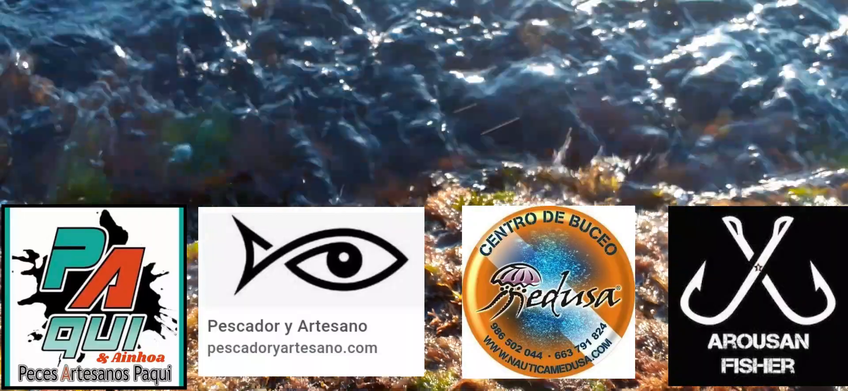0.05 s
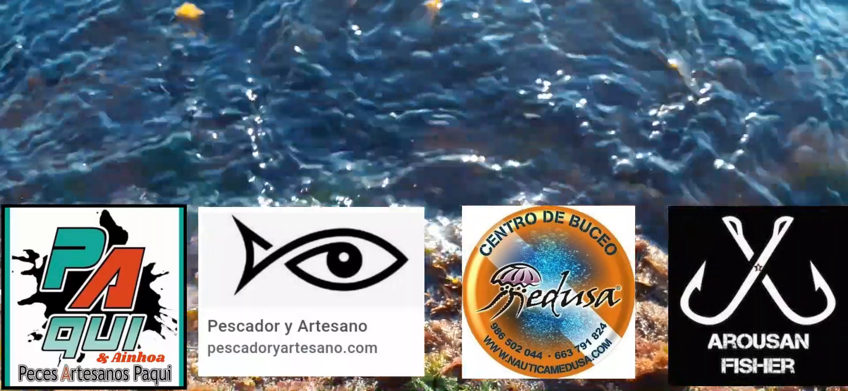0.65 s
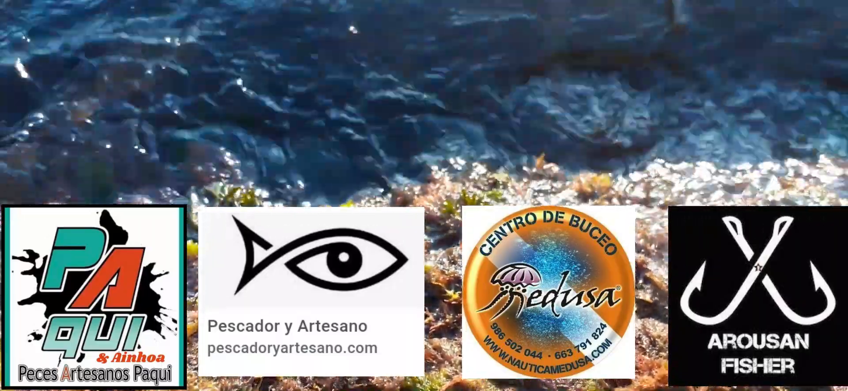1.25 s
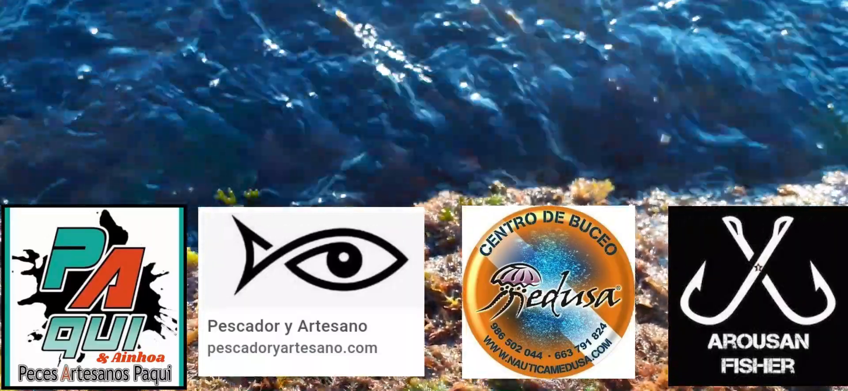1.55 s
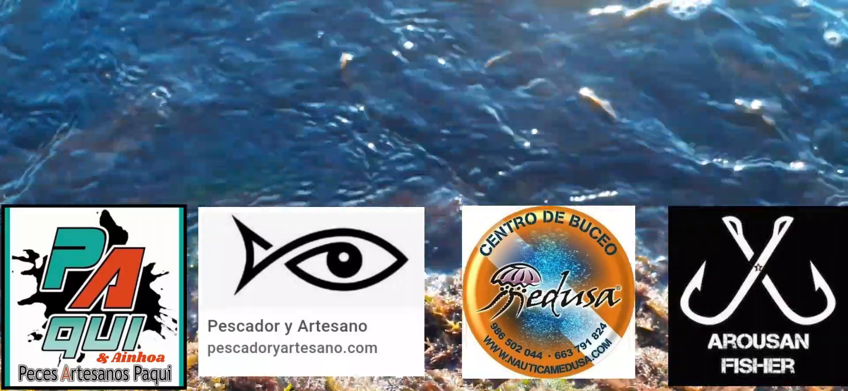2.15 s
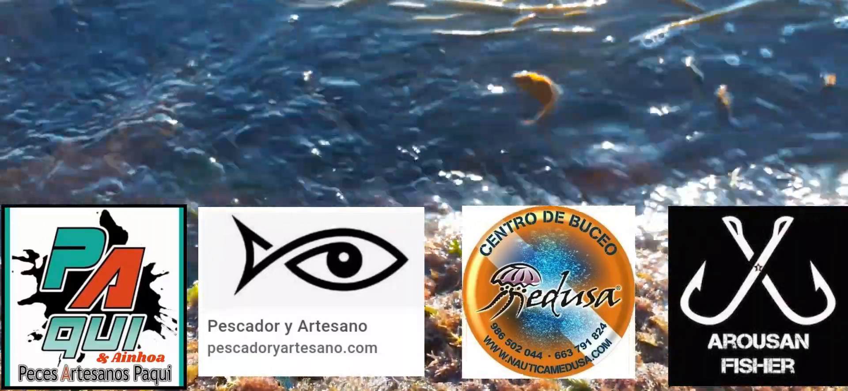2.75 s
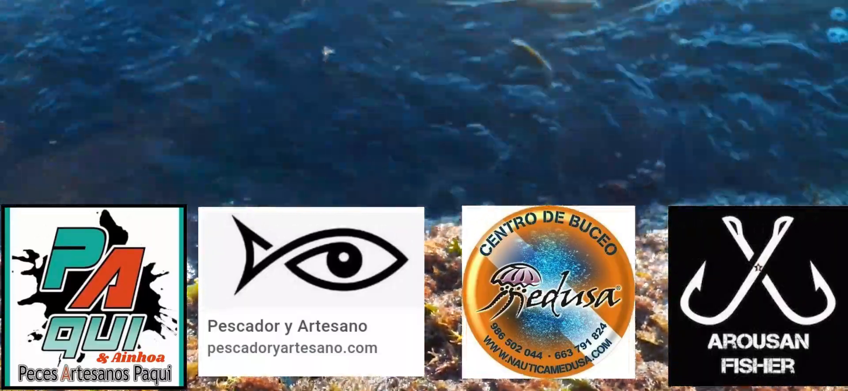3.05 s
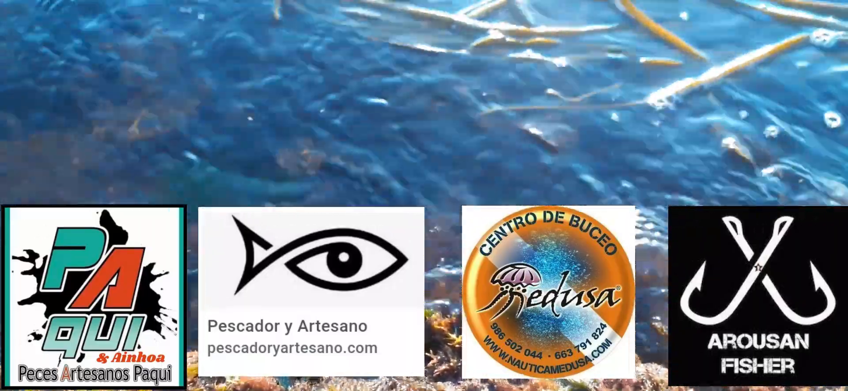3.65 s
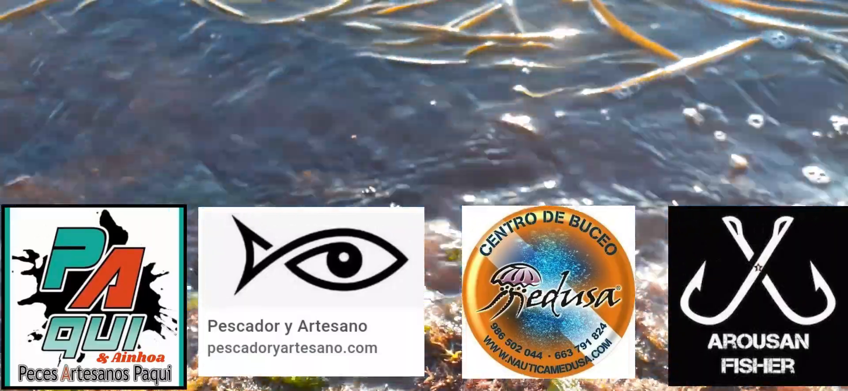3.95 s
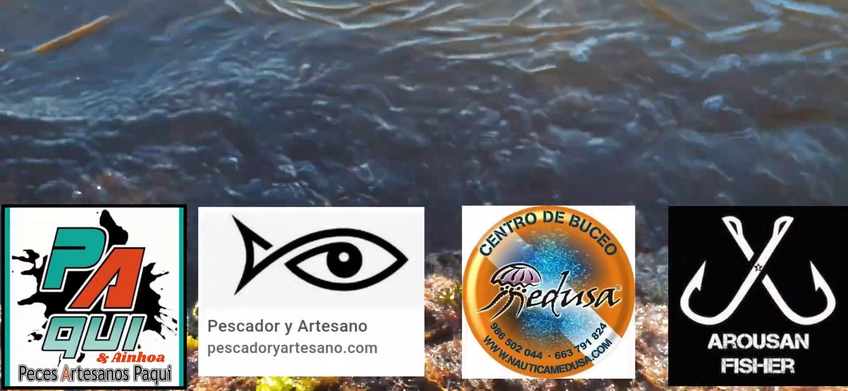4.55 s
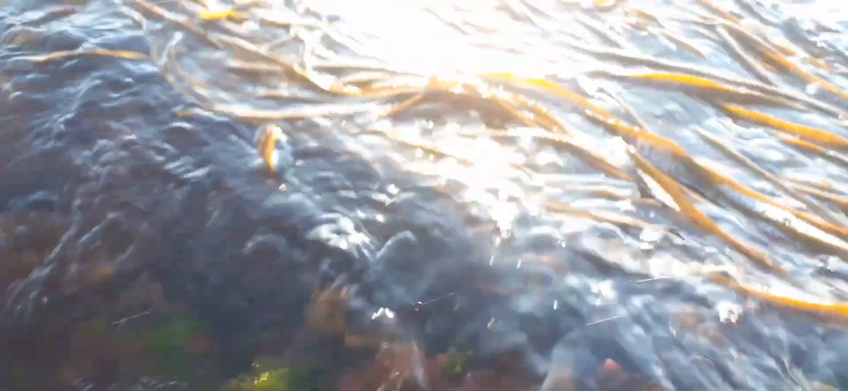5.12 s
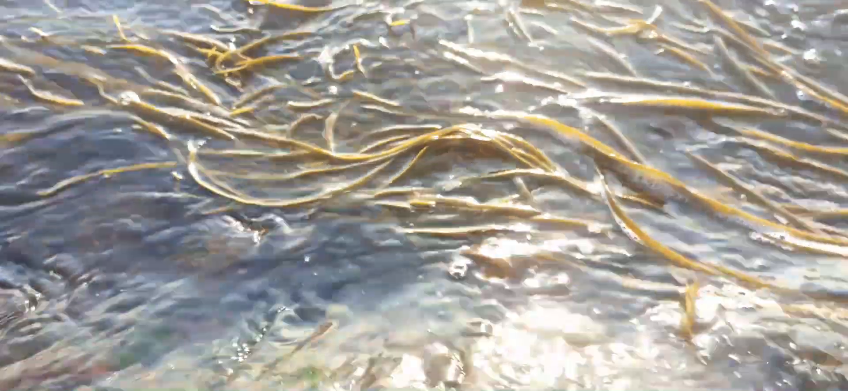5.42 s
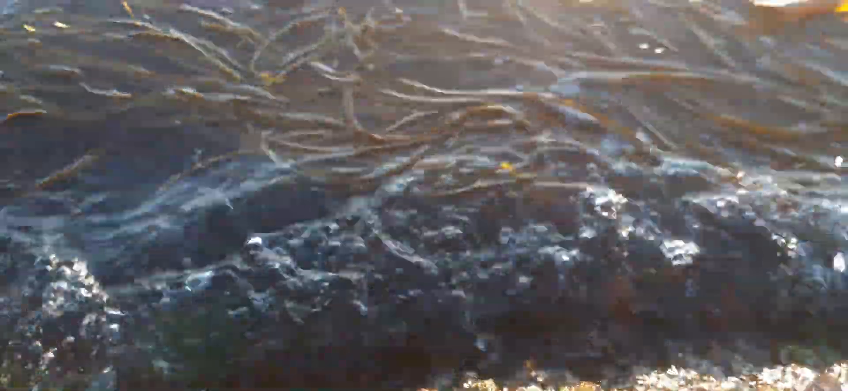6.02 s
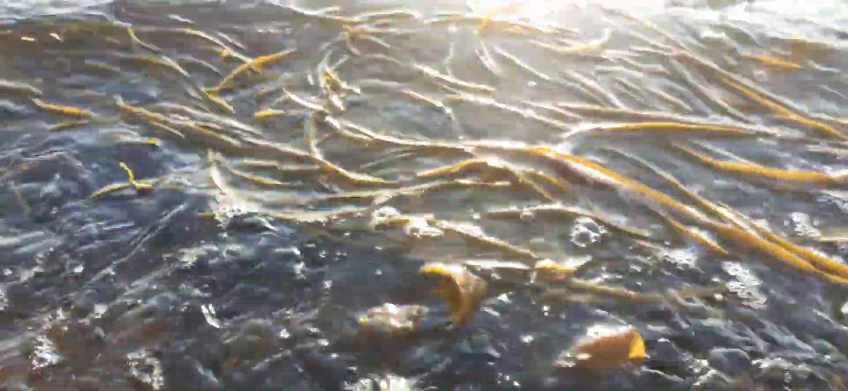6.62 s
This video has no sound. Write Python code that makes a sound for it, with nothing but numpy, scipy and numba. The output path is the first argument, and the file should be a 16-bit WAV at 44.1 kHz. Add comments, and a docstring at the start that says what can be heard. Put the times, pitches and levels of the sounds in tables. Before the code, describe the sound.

Shallow seawater laps and gurgles over shore rocks, building to louder splashes while a breeze buffets the microphone.

```python
"""Shallow sea laps over weedy shore rocks, close below a small stereo microphone; open sea hisses faintly.
From the start swarms of ringing bubbles gurgle, slosh, splash and fizz, with single drops, plops and
slaps standing out. A breeze buffets the two ports, mostly in the first 4 s. The lapping slowly builds.
From 3.7 s air pockets glug in rock hollows; from about 4.8 s the three biggest wavelets break."""
import sys
import numpy as np
from scipy import signal
from scipy.fft import rfft, irfft, next_fast_len
from scipy.io import wavfile
from scipy.ndimage import uniform_filter1d
from numba import njit

SR = 44100
rng = np.random.default_rng(int(sys.argv[2]) if len(sys.argv) > 2 else 0)


def bounce(signal):
    """Save signal as a 16-bit WAV file at the path given by the first command-line argument."""
    frames = np.transpose(np.atleast_2d(signal))
    limited = np.clip(frames, -1, 1)
    pcm = np.round(limited * 32767).astype(np.int16)
    wavfile.write(sys.argv[1], SR, pcm)


N = 303431
TIME_S = np.arange(N) / SR
FFT_SIZE = next_fast_len(N + 8192)
FREQS_HZ = np.maximum(np.fft.rfftfreq(FFT_SIZE, 1 / SR), 1)

# Table levels are relative; each source adds its own gain.
# layer spectra: freq_hz, gain_db
FAR_SEA_SPECTRUM = [(100, -58), (300, 8.5), (600, 8.5), (1000, -15), (1400, -21), (2200, -5), (4500, -5),
                    (7900, -5), (9500, -13.5), (12000, -5), (16000, -11)]
GURGLE_SPECTRUM = [(120, -26.5), (250, -6), (400, -2.5), (520, 0.5), (660, 2.5), (790, -4), (900, -9),
                   (1100, -5), (1500, -41.5)]
SLOSH_SPECTRUM = [(600, -26.5), (850, -7), (1000, -1), (1150, 0), (1350, 1), (1580, 1), (1760, -5.5),
                  (2300, -39)]
SPLASH_SPECTRUM = [(1200, -10), (1700, -3.5), (1950, -0.5), (2300, -1), (2700, -6.5), (3100, -9.5),
                   (4000, -22)]
SPRAY_SPECTRUM = [(2000, -28.5), (3200, -1.5), (4000, 1), (4700, -0.5), (5700, -0.5), (6600, 0), (7900, 0),
                  (8500, -7.5), (9200, -14.5), (10300, -8.5), (12000, -8), (13500, -6), (16000, -16)]
WIND_SPECTRUM = [(15, -31), (30, -9.5), (50, -3.5), (75, 1), (120, 0.5), (200, -5), (320, -11.5),
                 (500, -21), (1000, -52)]
# left-port delay round the microphone body at bearing 1: freq_hz, lag_ms
PORT_LAG = [(300, 0.43), (700, 0.29), (1000, 0.22), (1400, 0.36), (1750, 0.34), (2000, 0.844), (2600, 0.41),
            (4000, 0.29), (7000, 0.338)]
# stretches of shore (0 ahead, 1 far right): bearing
SHORE_BEARINGS = [1.034, 1.245, 0.777, 0.643, 0.363, -1.2]
# where the water is busiest: time_s, bearing
BUSIEST_BEARING = [(0, 0.76), (4.6, 0.98), (5.1, 0.74), (5.5, 1), (5.9, 0.64), (6.3, 0.82), (6.88, 0.98)]
# lapping between the rocks: time_s, level_db
LAPPING_FLOW = [(0.45, -57), (0.87, -57.5), (1.14, -53.5), (1.41, -55.5), (2.15, -46), (2.51, -47),
                (2.92, -48.5), (3.76, -44), (3.98, -42), (4.05, -48.5), (4.134, -43.5), (4.666, -43),
                (4.7, -48), (6.47, -40), (6.552, -47.5), (6.8, -42.5)]
# response of gurgle, slosh, splash, spray to the lapping: usual_level_db, db_per_flow_db
FLOW_RESPONSE = [(-42.5, 1.0), (-48.5, 1.01), (-49.5, 1.0), (-50, 1.4)]
# wavelets on the rocks: crest_s, rise_s, decay_s, gurgle_db, slosh_db, splash_db, spray_db
WAVELETS = [(0.053, .012, 0.018, -36, -49, -54, -50.5), (0.124, 0.0065, 0.046, -45, -48, -43.5, -48),
            (0.235, 0.013, 0.084, -41, -55, -51.5, -57), (0.38, 0.018, 0.0078, -54, -58, -49, -45),
            (2.66, 0.013, 0.11, -45, -53, -54, -64), (3.069, 0.078, 0.097, -47.5, -49.5, -52.5, -73),
            (3.305, 0.022, 0.048, -45, -44, -47, -44.5), (3.529, 0.069, 0.092, -37, -48, -47, -49.5),
            (3.914, 0.0072, 0.02, -29.5, -44, -43.5, -53), (4.754, 0.015, 0.22, -37, -37.5, -39.5, -41.5),
            (4.855, 0.015, 0.06, -21.5, -27.5, -28.5, -35), (4.971, 0.13, 0.25, -29, -35, -34.5, -38),
            (5.35, 0.057, 0.055, -38, -37, -46, -45.5), (5.839, 0.014, 0.22, -39.5, -31, -45, -42),
            (5.895, 0.11, .12, -41.5, -36.5, -37, -37), (6.195, 0.026, 0.015, -40, -49, -42, -40),
            (6.293, 0.0098, 0.039, -27.5, -29.5, -32.5, -49)]
# puffs of breeze: middle_s, half_length_s, level_db, left_minus_right_db
PUFFS = [(0.092, 0.017, -30, -3), (0.303, .13, -37, -7.5), (0.616, 0.058, -46.5, -12),
         (0.96, 0.022, -38.5, -10), (1.137, 0.064, -44, -18), (1.936, 0.089, -42.5, -1.5),
         (2.424, 0.038, -35.5, -8), (2.57, .11, -38, -5.5), (3.251, 0.052, -38.5, -5),
         (3.588, 0.036, -35.5, -5.5), (3.798, 0.084, -36.5, -23), (3.966, .04, -43, -13),
         (4.383, 0.058, -43.5, -11), (4.606, 0.069, -38.5, -4), (4.823, 0.064, -40, -5.5),
         (5.043, 0.046, -37, -1), (5.46, .12, -46, -10), (5.924, .22, -44.5, -7.5),
         (6.254, 0.038, -33.5, -9), (6.363, 0.025, -37.5, 2), (6.8, 0.025, -51, -21)]
# eddies hitting the ports: start_s, level_db, centre_hz, left_minus_right_db
EDDIES = [(0.032, -11, 101, 6), (0.043, -11, 151, 4), (0.054, -17.5, 480, 8), (0.077, -19, 400, -18),
          (0.1, -17.5, 93.5, -3), (0.148, -17, 201, -3.5), (0.214, -20.5, 109, -1), (0.231, -20, 225, 6.5),
          (0.281, -19.5, 92, 6), (0.569, -29.5, 287, -6), (0.599, -34.5, 203, 2), (0.628, -30, 160, 9),
          (0.959, -31.5, 300, -1.5), (1.199, -43, 200, -9), (1.941, -23.5, 266, 4), (2.344, -29, 118, -11),
          (2.393, -26, 89, -1), (2.526, -19, 90, -5), (2.647, -20.5, 225, -8), (2.756, -30, 130, -6),
          (3.382, -27.5, 207, 6), (3.554, -24.5, 286, 2.5), (3.584, -22, 165, -6), (3.808, -21.5, 403, 10),
          (3.988, -26, 197, 4), (4.572, -21.5, 151, -2.5)]
# flung drops landing: start_s, ring_db, pitch_hz, impact_db
DROPS = [(0.1208, -32, 7700, -42), (0.127, -22.5, 3540, -59), (0.135, -27, 3040, -61),
         (0.2184, -26, 4030, -43), (0.249, -32, 4700, -42), (0.363, -26, 4600, -44.5),
         (0.3765, -36, 3060, -47), (0.394, -30, 8000, -45), (0.4524, -32, 3290, -48.5),
         (0.5067, -21.5, 7160, -55), (1.6356, -45, 6900, -49), (1.94, -30.5, 3210, -61),
         (2.3281, -32.5, 3950, -66), (2.524, -25.5, 5280, -64), (3.3078, -18, 7540, -42),
         (3.4052, -31, 7960, -45.5), (3.5525, -14, 7080, -37), (3.6303, -17.5, 7130, -40),
         (4.7575, -37, 3100, -32.5), (4.8775, -14.5, 3770, -46), (5.0028, -18, 7600, -44),
         (5.0922, -15, 7540, -37), (5.1349, -19, 2870, -36), (5.8884, -14, 7600, -39),
         (5.895, -15.5, 4160, -32), (6.201, -13, 4770, -31.5), (6.322, -19.5, 3750, -52),
         (6.338, -20.5, 3980, -56.5), (6.4846, -34, 3280, -43), (6.6294, -22, 4300, -45),
         (6.7078, -40, 5340, -42.5)]
# single large bubbles: start_s, level_db, pitch_hz
PLOPS = [(0.121, -26, 1040), (1.6716, -39.5, 2180), (1.7265, -42, 1410), (3, -38, 1560),
         (3.1103, -33.5, 1360), (3.1802, -37.5, 2090), (3.3513, -37.5, 2030), (3.6758, -29, 1456),
         (4.8509, -17.5, 1940), (4.9253, -18, 2257), (4.98, -21, 1500), (5.3322, -25, 1160),
         (5.387, -21, 1330), (6.2882, -22, 2115), (6.3014, -22, 2120), (6.7583, -32, 1360)]
# sheets of water hitting rock: start_s, level_db, centre_hz, decay_s
SLAPS = [(0.122, -31, 1110, 0.003), (0.214, -22, 925, 0.0036), (0.24, -21, 2460, 0.0041),
         (3.287, -17, 2900, 0.0043), (3.552, -19, 1810, 0.0032), (3.906, -33, 1120, 0.0096),
         (4.194, -24.5, 950, 0.011), (4.653, -25, 2040, 0.0042), (4.719, -21, 2000, 0.018),
         (4.759, -19, 1100, 0.0039), (4.791, -17.5, 1130, 0.011), (4.816, -15, 1980, 0.0074),
         (4.869, -9.5, 1800, 0.046), (4.926, -9.5, 2160, 0.0062), (5.135, -14, 1250, 0.017),
         (5.759, -17.5, 1840, 0.0051), (5.806, -17, 2450, 0.0069), (5.828, -19, 1000, 0.0071),
         (5.843, -19, 1110, 0.019), (5.881, -16, 1300, 0.01), (5.937, -30, 1540, 0.0059),
         (6.179, -24, 1090, 0.0055), (6.63, -26, 2020, 0.012)]
# air pockets in rock hollows: start_s, level_db, pitch_hz, t60_s
GLUGS = [(3.719, -24, 375, 0.026), (4.846, -6.5, 756, 0.057), (4.85, -7.5, 470, 0.023),
         (4.863, -8.5, 717, 0.029), (4.882, -11, 697, 0.048), (5.039, -12, 621, 0.047),
         (5.497, -19.5, 320, 0.048), (5.665, -3.5, 266, 0.012), (5.808, -4, 224, 0.013),
         (5.905, -15.5, 275, 0.04), (6.101, -12.5, 196, 0.018), (6.223, -3.5, 405, 0.012),
         (6.25, -7.5, 192, 0.032), (6.265, -6, 320, 0.024), (6.344, -18.5, 172, 0.039)]


def from_db(db):
    """Decibels to gain."""
    return 10 ** (np.asarray(db) / 20)


def unit_rms(x):
    """Scale to rms 1."""
    return x / np.sqrt(np.mean(x ** 2) + 1e-20)


def curve(points):
    """A (time_s, value) table, per sample."""
    return np.interp(TIME_S, *np.transpose(points))


def drift(corner_hz):
    """Slow random wander, rms 1."""
    hop, settle = 40, 2000
    pole = np.exp(-2 * np.pi * corner_hz * hop / SR)
    noise = rng.standard_normal(N // hop + settle + 2)
    slow = signal.lfilter([1], [1, -2 * pole, pole ** 2], noise)[settle:]
    return np.interp(np.arange(N) / hop, np.arange(len(slow)), unit_rms(slow))


def bandpass(x, low_hz, high_hz):
    """Butterworth band-pass."""
    return signal.sosfilt(signal.butter(2, [low_hz, high_hz], "band", fs=SR, output="sos"), x)


def colour(x, spectrum):
    """Minimum-phase filter with the given spectrum."""
    freq_hz, gain_db = np.transpose(spectrum)
    gain = from_db(np.interp(np.log(FREQS_HZ), np.log(freq_hz), gain_db))
    cepstrum = irfft(np.log(gain), FFT_SIZE)
    cepstrum[1:FFT_SIZE // 2] *= 2
    cepstrum[FFT_SIZE // 2 + 1:] = 0
    return irfft(rfft(x, FFT_SIZE) * np.exp(rfft(cepstrum)), FFT_SIZE)[..., :N]


def levelled(x, span_s):
    """Hold the stereo mid at rms 1 over span_s; faster grain stays."""
    size = int(span_s * SR)
    power = uniform_filter1d(uniform_filter1d(x.mean(0) ** 2, size), size)
    return x / np.sqrt(np.maximum(power, 1e-6 * power.mean()))


def at_ports(streams, echo_t60_s=0.045, echo_db=-7.5):
    """One stream per bearing reaches both ports, direct and scattered by the rocks."""
    spectra = rfft(np.atleast_2d(streams), FFT_SIZE)
    freq_hz, lag_ms = np.transpose(PORT_LAG)
    lag_s = np.interp(np.log(FREQS_HZ), np.log(freq_hz), lag_ms) / 1000
    lag_rad = 2 * np.pi * FREQS_HZ * lag_s
    left = sum(part * np.exp(-1j * lag_rad * bearing) for part, bearing in zip(spectra, SHORE_BEARINGS))
    right = spectra.sum(0)
    t = TIME_S[:8192]
    scatter = rng.standard_normal((2, len(t))) * from_db(-60 * t / echo_t60_s) * (t > 0.001)
    scatter *= from_db(echo_db) / np.sqrt((scatter ** 2).sum(1, keepdims=True))
    return irfft(np.array([left, right]) + right * rfft(scatter, FFT_SIZE), FFT_SIZE)[:, :N]


def far_sea(level_db=-58.5):
    """Open sea: faint, even hiss."""
    return from_db(level_db) * unit_rms(colour(rng.standard_normal((2, N)), FAR_SEA_SPECTRUM))


def water_levels_db(usual_flow_db=-41, uneven_db=2.68, foam_linger=1.61):
    """Level per bubble size: lapping plus wavelets that swell, crest and drain; foam lasts longest."""
    flow_db = curve(LAPPING_FLOW) - usual_flow_db + uneven_db * drift(13)
    power = np.array([from_db(usual_db + slope * flow_db) ** 2 for usual_db, slope in FLOW_RESPONSE])
    for crest_s, rise_s, decay_s, *sizes_db in WAVELETS:
        age_s = TIME_S - crest_s
        body, foam = (np.exp(np.maximum(np.minimum(age_s / rise_s, -age_s / fall_s), -20))
                      for fall_s in (decay_s, decay_s * foam_linger))
        power += (from_db(sizes_db)[:, None] * np.array([body, body, body, foam])) ** 2
    return 10 * np.log10(power)


@njit
def bubbles(start_s, height, pitch_hz, t60_s, rise, swell_cycles):
    """Sines swell and die; nearing the surface, pitch climbs by the fraction `rise`."""
    out = np.zeros(N)
    for k in range(len(start_s)):
        first, length = int(start_s[k] * SR), max(int(t60_s[k] * SR), 2)
        step_rad = 2 * np.pi * pitch_hz[k] / SR
        spin = np.exp(-6.9 / length + 1j * step_rad)
        glide = np.exp(1j * step_rad * rise / length)
        opening = np.exp(-pitch_hz[k] / SR / swell_cycles)
        wave, closed = height[k] + 0j, 1.0
        for i in range(first, min(first + length, N)):
            out[i] += wave.imag * (1 - closed)
            wave *= spin
            spin *= glide
            closed *= opening
    return out


def heights(size, sign, spread_db):
    """Uniform draws to signed heights, a few far above the rest."""
    return from_db(spread_db * np.minimum(-np.log(1 - size), 5)) * np.sign(sign - 0.5)


def swarm(level_db, low_hz, high_hz, tries, cycles, spread_db, clump_db, blur_db, rise, swell_cycles):
    """Bubbles clump along the shore, more in stronger flow, over a blur of countless faint ones."""
    birth_chance = from_db(0.2 * (level_db - level_db.max()))
    clumps = from_db(clump_db * drift(71))
    streams = []
    for _ in SHORE_BEARINGS:
        when, pitch, size, damping, luck, sign = rng.random((tries, 6)).T
        first = (when * (N - 1)).astype(int)
        pitch_hz = low_hz * (high_hz / low_hz) ** pitch
        height = pitch_hz * heights(size, sign, spread_db)  # brief bubbles need more height
        t60_s = cycles * 2 ** (2 * damping - 1) / pitch_hz
        born = luck < birth_chance[first]
        start_s = TIME_S[first[born]]
        streams.append(bubbles(start_s, height[born], pitch_hz[born], t60_s[born], rise, swell_cycles))
    near = unit_rms(np.array(streams) / np.sqrt(birth_chance))
    blur = unit_rms(bandpass(rng.standard_normal(near.shape), low_hz, high_hz))
    off_centre = np.array(SHORE_BEARINGS)[:, None] - curve(BUSIEST_BEARING)
    share = 0.5 + np.exp(-(off_centre / 0.35) ** 2)
    return at_ports((near + from_db(blur_db) * blur) * clumps * share)


def foam_crackle(count=6000, spread_db=7.5):
    """Foam cells burst on rock in tiny broadband clicks; rms 1."""
    streams = np.zeros((len(SHORE_BEARINGS), N))
    when, size, place, sign = rng.random((count, 4)).T
    stretch = (place * len(SHORE_BEARINGS)).astype(int)
    streams[stretch, (when * (N - 1)).astype(int)] = heights(size, sign, spread_db)
    return unit_rms(at_ports(streams))


def wash(crackle_db=-11):
    """Big bubbles gurgle, smaller ones slosh and splash, the finest fizz and crackle as spray."""
    gurgle_db, slosh_db, splash_db, spray_db = water_levels_db()
    gurgle = swarm(gurgle_db, low_hz=227, high_hz=1260, tries=700, cycles=13.8,
                   spread_db=2.5, clump_db=-0.5, blur_db=-4, rise=0.07, swell_cycles=0.41)
    slosh = swarm(slosh_db, low_hz=752, high_hz=1994, tries=1000, cycles=18.7,
                  spread_db=2.5, clump_db=2.5, blur_db=-6.5, rise=0.18, swell_cycles=1.0)
    splash = swarm(splash_db, low_hz=1542, high_hz=3780, tries=1500, cycles=13.2,
                   spread_db=3, clump_db=2.1, blur_db=-2, rise=0.19, swell_cycles=2.3)
    fizz = swarm(spray_db, low_hz=2766, high_hz=15800, tries=4500, cycles=22,
                 spread_db=3.5, clump_db=1.5, blur_db=-4, rise=0.15, swell_cycles=11.0)
    spray = unit_rms(fizz) + from_db(crackle_db) * foam_crackle()
    return (from_db(gurgle_db + 2) * levelled(colour(gurgle, GURGLE_SPECTRUM), span_s=0.06)
            + from_db(slosh_db + 0.58) * levelled(colour(slosh, SLOSH_SPECTRUM), span_s=0.053)
            + from_db(splash_db + 1.75) * levelled(colour(splash, SPLASH_SPECTRUM), span_s=0.029)
            + from_db(spray_db - 0.36) * levelled(colour(spray, SPRAY_SPECTRUM), span_s=0.049))


def port_gains(pan_db, shelter_db=16):
    """Constant-power pan; the body shelters the lee port by shelter_db at most."""
    gains = from_db(np.clip([[pan_db], [-pan_db]], -shelter_db, shelter_db) / 2)
    return gains / np.sqrt((gains ** 2).mean())


def breeze(lumpy_db=5, unsteady_db=-0.5):
    """Turbulence rumbles in each port separately: light air, mostly right, plus bell-shaped puffs."""
    light_air_db = -57 + unsteady_db * drift(5)
    power = (from_db(light_air_db) * port_gains(-16)) ** 2
    for middle_s, half_length_s, level_db, pan_db in PUFFS:
        bell = np.exp(-np.minimum(((TIME_S - middle_s) / half_length_s) ** 2, 20))
        power += (from_db(level_db) * port_gains(pan_db)) ** 2 * bell
    lumps = from_db(lumpy_db * np.array([drift(29), drift(36)]))
    rumble = colour(rng.standard_normal((2, N)) * lumps, WIND_SPECTRUM)
    return from_db(3.5) * np.sqrt(power) * levelled(rumble, span_s=0.12)


def eddies(band_ratio=1.295, swell_s=0.00685, flutter_band_hz=(292.3, 457.5), flutter_db=-9.5):
    """Short swells of low pressure swings under a lighter flutter, different in each port."""
    out, t = np.zeros((2, N + SR)), TIME_S[:SR // 5]
    envelope = t * np.exp(-t / swell_s)
    for start_s, level_db, centre_hz, pan_db in EDDIES:
        swing_noise, flutter_noise = rng.standard_normal((2, 2, 2 * len(t)))
        swing = unit_rms(bandpass(swing_noise, centre_hz / band_ratio, centre_hz * band_ratio))
        flutter = from_db(flutter_db) * unit_rms(bandpass(flutter_noise, *flutter_band_hz))
        eddy = (swing + flutter)[:, len(t):] * envelope * from_db([[pan_db / 2], [-pan_db / 2]])
        first = int(start_s * SR)
        out[:, first:first + len(t)] += from_db(level_db - 0.5) * eddy / np.abs(eddy.mean(0)).max()
    return out[:, :N]


def drops(ring_cycles=36, tick_s=0.0011):
    """Each drop splatters in a tick and leaves a tiny ringing bubble."""
    start_s, ring_db, pitch_hz, impact_db = np.transpose(DROPS)
    hits = np.zeros(N)
    hits[(start_s * SR).astype(int)] = from_db(impact_db + 15)
    pole = np.exp(-1 / (tick_s * SR))
    envelope = signal.lfilter([np.e * (1 - pole)], [1, -2 * pole, pole ** 2], hits + 1e-18)
    ticks = colour(envelope * rng.standard_normal(N), SPRAY_SPECTRUM)
    t60_s = ring_cycles / pitch_hz
    rings = bubbles(start_s, from_db(ring_db + 4), pitch_hz, t60_s, rise=0.2, swell_cycles=2.15)
    return at_ports(ticks + rings)


def plops(ring_s=0.021):
    """A large bubble pinches off and rings briefly."""
    start_s, level_db, pitch_hz = np.transpose(PLOPS)
    t60_s = np.full(len(start_s), ring_s)
    rings = bubbles(start_s, from_db(level_db + 14.5), pitch_hz, t60_s, rise=0.18, swell_cycles=1.33)
    return at_ports(rings)


def slaps(band_ratio=1.3, roughness=0.083):
    """A sheet of water smacks the rock, then shreds into a rough tail."""
    out, t = np.zeros(N + SR), TIME_S[:SR // 8]
    for start_s, level_db, centre_hz, decay_s in SLAPS:
        force = roughness * rng.standard_normal(len(t)) * np.exp(-t / decay_s)
        force[0] = 1  # impact
        smack = bandpass(force, centre_hz / band_ratio, centre_hz * band_ratio)
        first = int(start_s * SR)
        out[first:first + len(t)] += from_db(level_db - 2.5) * smack / np.abs(smack).max()
    return at_ports(out[:N])


def glugs():
    """Air squeezed from a rock hollow swells into a short, low ring."""
    start_s, level_db, pitch_hz, t60_s = np.transpose(GLUGS)
    rings = bubbles(start_s, from_db(level_db + 3), pitch_hz, t60_s, rise=0.24, swell_cycles=1.0)
    return at_ports(rings)


def scene():
    """Water in front, wind on the microphone."""
    return far_sea() + wash() + breeze() + eddies() + drops() + plops() + slaps() + glugs()


def record(dry, low_cut_hz=38, ceiling=0.95, high_cut_hz=16300):
    """Lowest rumble trimmed; then the recorder: soft clip, steep high cut."""
    thinned = signal.sosfilt(signal.butter(2, low_cut_hz, "high", fs=SR, output="sos"), dry)
    rounded = thinned / (1 + (thinned / ceiling) ** 6) ** (1 / 6)
    return signal.sosfilt(signal.ellip(10, 0.1, 80, high_cut_hz, fs=SR, output="sos"), rounded)


dry = scene()
out = record(dry)
bounce(out)
```